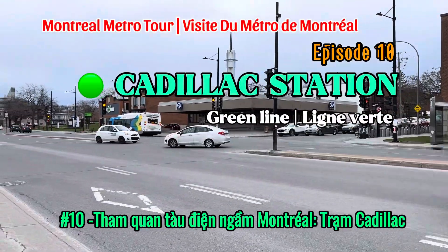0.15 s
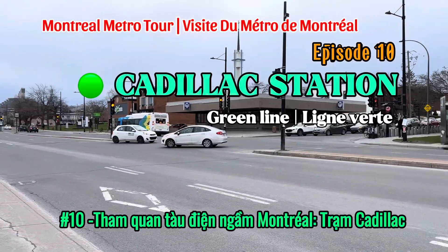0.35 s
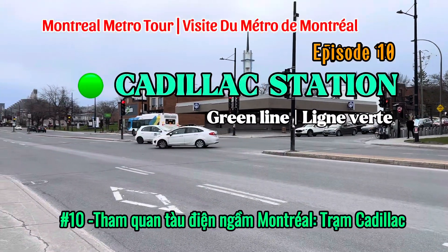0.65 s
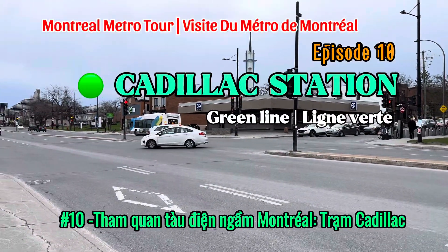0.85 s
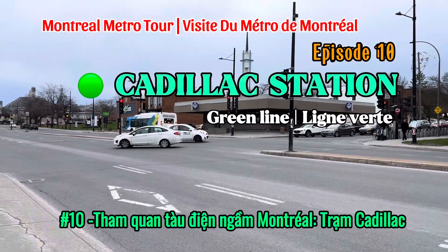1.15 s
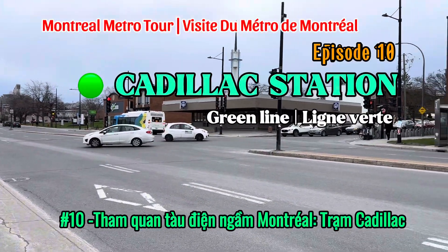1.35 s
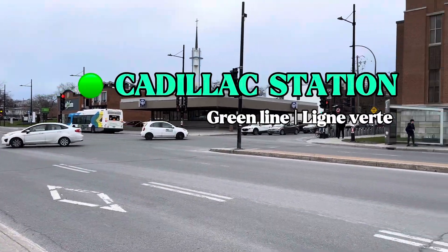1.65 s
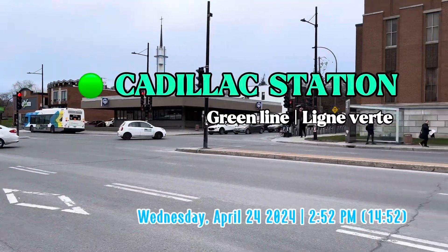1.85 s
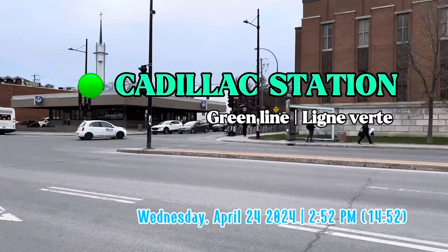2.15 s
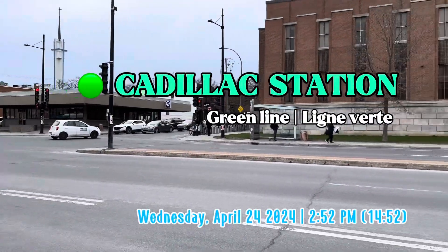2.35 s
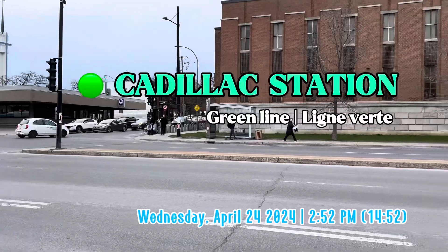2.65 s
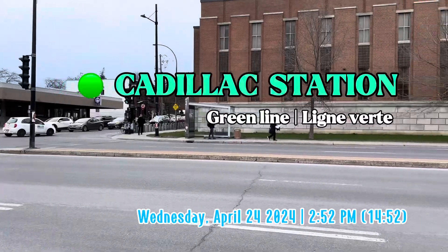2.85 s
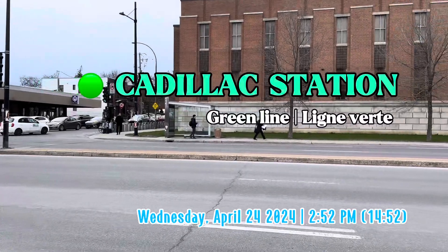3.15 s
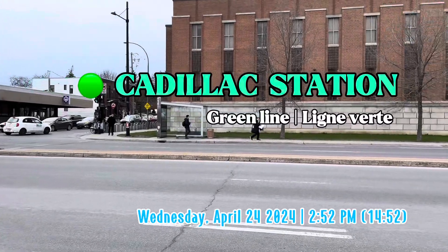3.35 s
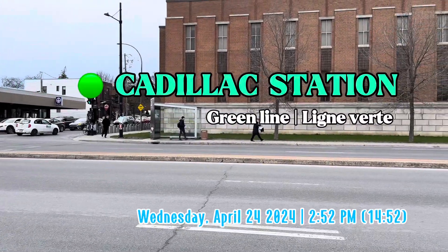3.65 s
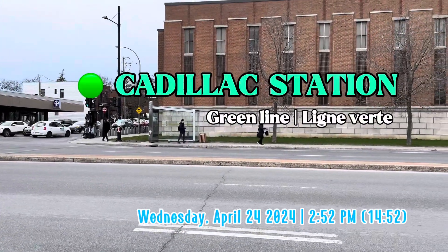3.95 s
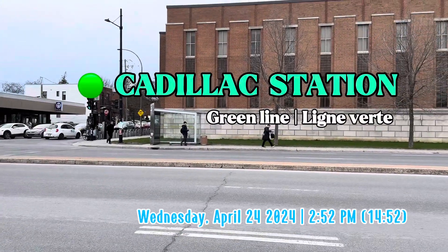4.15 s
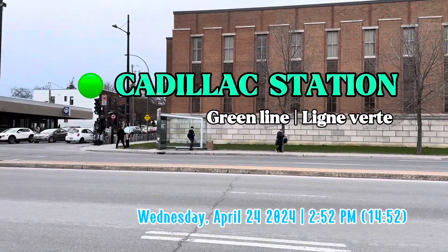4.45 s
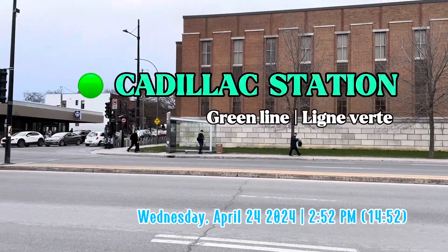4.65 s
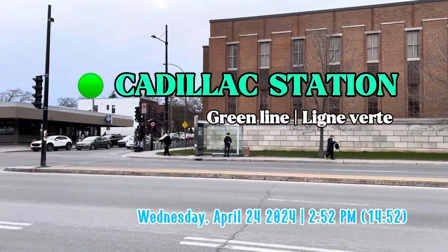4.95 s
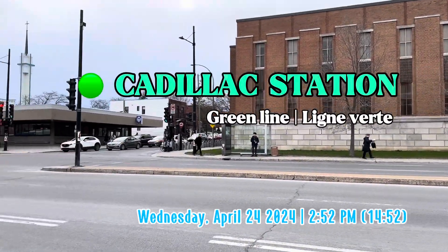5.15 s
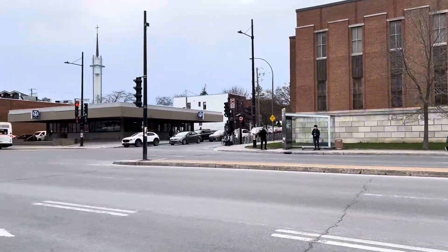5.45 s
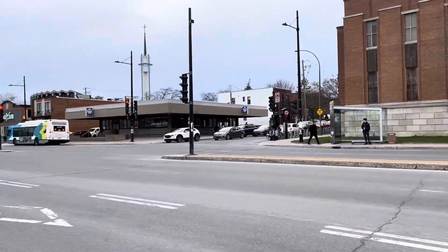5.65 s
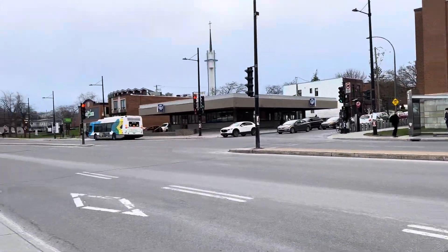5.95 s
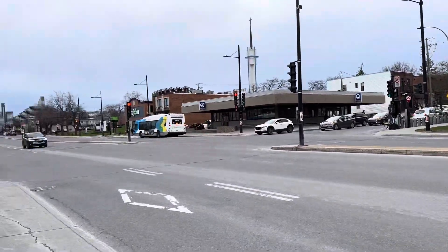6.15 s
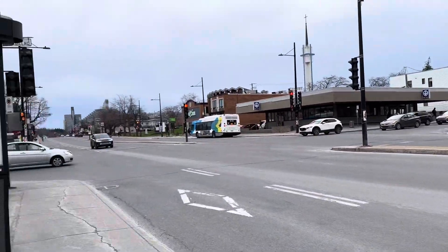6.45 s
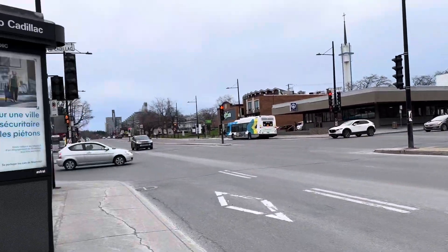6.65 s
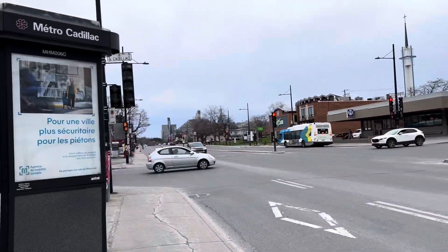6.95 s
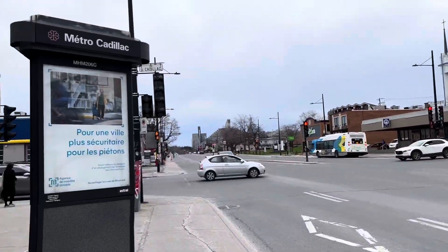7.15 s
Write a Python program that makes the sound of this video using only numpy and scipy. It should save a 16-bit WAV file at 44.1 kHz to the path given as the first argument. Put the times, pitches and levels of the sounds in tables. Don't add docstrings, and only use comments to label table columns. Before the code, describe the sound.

Steady traffic rumble and tyre wash with low buffeting thumps early, gritty snaps, a humming bus engine, and thin high brake squeals near the end.

```python
import sys
import numpy as np
from scipy import signal
from scipy.fft import rfft, irfft
from scipy.io import wavfile
from scipy.ndimage import uniform_filter1d, minimum_filter1d

SR = 44100
rng = np.random.default_rng(int(sys.argv[2]) if len(sys.argv) > 2 else 0)


def volts_from_db(level):
    exponent = np.asarray(level, float) / 20
    return 10 ** exponent


def transcribe(signal):
    frames = np.atleast_2d(signal).T
    limited = np.clip(frames, -1, 1)
    pcm = np.round(limited * 32767).astype(np.int16)
    wavfile.write(sys.argv[1], SR, pcm)


N = 321489
FRAME, HOP = 1024, 256
T = np.arange(N) / SR
FRAME_T = np.arange(N // HOP + 5) * HOP / SR
FRAME_HZ = np.fft.rfftfreq(FRAME, 1 / SR)[:, None]

# pitch_hz, level_db (per Hz)
RUMBLE_COLOUR = [(20, -43.5), (32, -29.5), (45, -2), (64, -2), (120, -7.5), (166, -5), (244, -5),
                 (338, -9.5), (556, -19.5), (900, -42.5), (1200, -78.5)]
TYRE_COLOUR = [(250, -40), (450, -7), (620, -7.5), (850, -2.5), (1100, 6.5), (1500, -2), (2000, -9),
               (2600, -14), (3200, -21), (4500, -37), (7000, -62.5), (11000, -88)]
SLOW_CAR_COLOUR = [(300, -29), (450, 1.5), (600, 4.5), (850, -2.5), (1200, -3), (2000, -14), (2700, -14),
                   (3300, -18), (6000, -33), (11000, -91)]
SPRAY_COLOUR = [(2200, -34.5), (3200, 0), (4200, 1), (5200, -1.5), (6200, -4.5), (7200, -12.5), (8500, -14),
                (10000, -40), (12500, -53.5)]
FAN_COLOUR = [(5600, -18), (7200, -2), (8600, -3), (9400, -3.5), (10200, -7), (11500, -12), (11900, -17),
              (12800, -19.5), (13800, -22.5), (15500, -28), (16000, -60)]
FAST_TREAD_COLOUR = [(700, -33), (1200, 2.5), (1700, -4), (2500, -14), (2900, -15), (4500, -48),
                     (9000, -76.5)]
UNDERBODY_COLOUR = [(100, -29.5), (190, 1), (320, 5), (500, -10), (750, -17.5), (1300, -32.5),
                    (3000, -81.5)]
CLOSE_TYRE_COLOUR = [(500, -29), (800, -3.5), (1020, 3), (1300, -17), (1600, -1), (1850, -11.5),
                     (2500, -12), (4000, -41.5)]
BREEZE_COLOUR = [(20, -4), (50, 3), (100, -2), (200, -19), (400, -53.5)]

# closest_s, roar_db, distance_over_speed_s, spray_db
RIGHT_LANE = [
    (0.0, -34, 0.27, -48.5),
    (.65, -34.5, 0.29, -69.5),
    (1.0, -34.5, 0.79, -54.5),
    (2.15, -41, 0.27, -66),
    (2.7, -41.5, 0.68, -65.5),
    (4.1, -41.5, 0.21, -62.5),
    (4.9, -39.5, 0.37, -67),
]
LEFT_LANE = [
    (.06, -34, 0.18, -57),
    (1.3, -45, 0.49, -52.5),
    (5.9, -48, 0.74, -76),
    (6.5, -41.5, 0.83, -56),
]
# closest_s, roar_db, distance_over_speed_s
FAR_LANE = [
    (2.6, -43, 0.74),
    (4.2, -48, 0.26),
    (4.75, -45.5, 0.31),
    (5.25, -45, .2),
    (6.15, -56, 0.28),
]
# closest_s, boom_db, distance_over_speed_s
CLOSE_BOOM = [
    (.2, -31, 0.26),
]
# closest_s, roar_db, distance_over_speed_s
CLOSE_ROAR = [
    (.06, -33, 0.14),
]
# time_s, level_db, left_late_samples
NEARING = [(5.8, -46.5, -4.5), (6.3, -43, -5), (6.7, -42.5, -3), (7, -38.5, -1.5), (7.29, -41, 1.5)]
# time_s, left_late_samples
RIGHT_LAG = [(0, 6.6), (.12, 11), (.32, 17.9), (1.35, 16.1), (2.2, 17.8), (7.29, 20.8)]
# time_s, direct_share (0-1)
FACING = [(0, 1), (5.55, 1), (5.95, .3), (7.29, .15)]
# pitch_hz, likeness (-1 to 1)
DIFFUSE = [(60, .975), (170, .9), (340, .78), (480, .15), (620, -.65), (900, -.85)]
# pitch_hz, left_late_samples
BEND = [(8500, 15.5), (10100, 15.3), (11000, 15), (11800, 14.8), (13700, 14.5), (15200, 14.5)]

# time_s, firing_tone_db
LOAD = [(0, -32), (1.1, -35), (1.7, -37), (2.0, -30.5), (2.25, -37.5), (2.6, -32.5), (2.85, -38),
        (3.3, -35.5), (3.8, -31.5), (4.5, -35.5), (4.95, -29.5), (5.2, -35), (5.4, -36), (6.15, -40),
        (6.4, -34.5), (6.6, -36), (6.9, -30.5), (7.29, -37)]
# time_s, tick_db
BAY = [(0, -65), (.8, -92), (1.2, -67.5), (1.7, -80.5), (2.3, -90), (3.1, -100), (3.4, -86), (3.7, -100),
       (5.2, -90.5), (5.65, -73), (6.1, -71), (6.45, -59), (6.6, -72), (6.85, -59), (7.29, -62)]
# time_s, level_db
BREEZE = [(0, -52), (1.4, -50), (1.8, -70), (6.4, -66), (6.7, -48), (7.29, -50.5)]
# start_s, length_s, level_db
PUFFS = [
    (0, .45, -76),
    (.5, .12, -84),
    (.76, .2, -81),
    (1.36, .16, -82),
    (1.9, .1, -84),
    (2.3, .08, -85),
    (3.4, .11, -82),
    (5.5, .45, -86),
    (6.43, .08, -80),
]
# middle_s, level_db, swing_hz, length_s
EDDIES = [(0.504, -8, 89.7, 0.0401), (0.527, -13, 95, .04), (0.573, -15.5, 57, .06),
          (0.618, -18, 81, 0.098), (0.645, -15, 77, 0.037), (0.685, -14, 61.6, 0.043),
          (0.763, -15, 75, 0.0503), (0.812, -18, 99.6, .05), (.865, -14, 175, 0.0301),
          (0.869, -17, 74.5, 0.039), (0.884, -10.5, 129, 0.0302), (0.993, -13, 114.5, .035),
          (1.023, -9, 77, 0.042), (0.864, -20.5, 285, 0.018), (1.02, -14.5, 183, 0.0324),
          (1.206, -19.5, 204, 0.027), (1.045, -9, 85.6, .045), (1.051, -27, 190, 0.021),
          (1.133, -24.5, 85, .04), (1.164, -12, 141.5, 0.0277), (1.183, -17.5, 63, 0.053),
          (1.217, -17.5, 89.5, 0.039), (1.263, -12, 68.4, 0.052), (1.258, -19.5, 145, 0.023),
          (1.308, -8.5, 80.8, 0.046), (1.381, -34, 71.6, .05), (5.295, -19, 304, 0.0079),
          (7.003, -17, 178, 0.0085)]
# start_s, length_s, pitch_hz, peak_db, grab_period_s
SQUEALS = [
    (6.105, .35, 9515, -49.5, .18),
    (7.13, .15, 11447, -69, .065),
    (6.28, .22, 7210, -72, .07),
    (6.44, .09, 9500, -64, .06),
]
# start_s, level_db, pitch_hz, length_s, left_over_right_db
CHIRPS = [(.765, -59, 5150, .025, 6), (1.652, -55.5, 5500, 0.034, 8), (4.79, -62, 3850, 0.03, -2),
          (4.797, -63, 5050, .022, 0), (4.84, -62, 3750, .024, 0), (5.408, -53, 4130, .025, -1),
          (5.452, -46, 4340, 0.014, 0), (5.452, -61, 5850, .015, 3), (5.452, -61, 6650, .015, 3),
          (5.822, -62, 6030, .025, 4), (5.858, -63, 6050, .022, 4)]
# start_s, level_db
SLIPS = [
    (6.69, -60),
    (6.746, -57),
    (6.838, -57),
    (6.885, -58),
    (6.922, -58),
    (6.968, -62),
    (7.04, -64),
    (7.075, -67),
    (7.108, -65),
]
# start_s, peak_db, centre_hz, width_hz, left_over_right_db
SNAPS = [(1.3229, -28.5, 3300, 1000, 5), (1.3233, -35, 2400, 700, 1), (1.3232, -41, 6300, 1100, 1),
         (1.323, -45, 11400, 2200, 2), (1.3232, -58, 14500, 2000, 0), (1.3352, -40, 3100, 1200, 4),
         (1.337, -33.5, 3350, 800, 5), (1.339, -40, 3300, 1200, 3), (1.3375, -38, 2200, 900, -3),
         (1.3375, -51, 8600, 1500, 1), (1.3358, -41, 6300, 1200, -3), (1.3358, -44, 8500, 1800, 1),
         (1.3355, -47, 11000, 1800, 1), (1.0305, -45, 8300, 1800, -9), (2.3297, -55, 6500, 5000, 2),
         (3.38, -56, 13500, 4000, -3), (3.479, -51, 11500, 5000, -5), (3.4795, -53, 8500, 2000, -4),
         (3.62, -43.5, 6200, 900, 13), (3.62, -52, 8200, 2000, 7), (3.62, -59, 13000, 6000, 4),
         (4.0996, -27, 950, 500, -2), (4.102, -30, 1700, 500, 4), (4.101, -51.5, 8600, 1600, -8),
         (5.0235, -49, 5500, 2800, 2), (5.2185, -56, 8200, 2500, -2), (5.2185, -48, 3300, 900, -1),
         (5.2885, -50, 5800, 2800, 2), (5.289, -46, 3300, 1000, 1), (5.291, -30, 450, 300, 0),
         (5.318, -57, 8600, 900, -13), (5.3205, -54, 8500, 900, -8), (5.3232, -40, 3700, 900, -3),
         (5.3236, -41, 5100, 1200, -6), (5.3258, -44, 5000, 1400, -6), (5.3252, -45, 3700, 900, -4),
         (5.3238, -46, 8800, 1800, -6), (5.3248, -33, 2300, 800, -5), (5.3245, -28.5, 1500, 800, 1),
         (5.3262, -35, 1700, 900, 0), (5.3245, -53, 14000, 4000, -3), (5.3245, -52, 11000, 2000, -3)]

# pitch_hz, left_over_right_db
PORTS = [(60, 0), (170, 0), (500, 1.5), (950, -2), (1900, -3), (2700, -1), (3900, 2), (5200, 4.5),
         (6000, 6.5), (7000, 3), (8500, -2.5), (11000, -2)]
# pitch_hz, level_db
CENTRE = [(900, 0.1), (1090, -2.5), (1280, 0.5), (1550, 0.3), (1800, 1), (2050, 1.7), (2700, 0),
          (3000, -0.5)]
# pitch_hz, side_gain_db
SIDE_GAIN = [(60, 0.5), (150, 0.5), (300, 1.5), (500, 2), (800, 7.5), (1050, -0.4), (1400, 0), (1800, 4),
             (2050, 0.5), (2900, -1), (4500, -1.5), (8000, -0.5)]


def evened(x):
    return x / np.sqrt(np.mean(x ** 2) + 1e-20)


def read(points, hz):
    f, value = np.transpose(points)
    return np.interp(np.log(hz + 1), np.log(f + 1), value)


def column(rows, t, order):
    rows = np.array(rows, float)
    return np.interp(t, rows[:, 0], rows[:, order])


def add(mix, s, sound, pan_db=0, lag=0):
    for side, (shift, sign) in enumerate([(lag, 1), (0, -1)]):
        part = mix[side, round(s * SR) + round(shift):][:len(sound)]
        part += sound[:len(part)] * volts_from_db(sign * pan_db / 2)


def wander(rate_hz, size):
    white = rng.standard_normal(size) * (np.arange(size) > 0)
    lowpass = signal.butter(2, rate_hz, fs=SR, output="sos")
    return evened(signal.sosfiltfilt(lowpass, white, padtype=None))


def summed(*dbs):
    return 10 * np.log10(sum(volts_from_db(2 * db) for db in dbs))


def lane(cars, t, order):
    return summed(*(car[order] - 11 * np.log10(1 + ((t - car[0]) / car[2]) ** 2) for car in cars))


def stream(colour, db, same, patchy_db, lag=0):
    a, b, c, d, patches = rng.standard_normal((len(FRAME_T), len(FRAME_HZ), 5)).T
    patches = uniform_filter1d(patches, size=12, axis=0)
    patches = evened(uniform_filter1d(patches, size=16, axis=1))
    same = np.clip(same, -1, 1)
    right = a + 1j * b
    direct = right * np.exp(-2j * np.pi * FRAME_HZ * lag / SR)
    left = same * direct + np.sqrt(1 - same ** 2) * (c + 1j * d)
    z = np.array([left, right]) * volts_from_db(read(colour, FRAME_HZ) + patchy_db * patches)
    noise = signal.istft(z, nperseg=FRAME, noverlap=FRAME - HOP)[1][:, :N]
    return volts_from_db(db) * evened(noise)


def rumble():
    tail_s = 0.19
    roar_db = lane(RIGHT_LANE + LEFT_LANE, T - tail_s, order=1)
    near_db = column(NEARING, T, order=1)
    db = summed(summed(roar_db, near_db) + 0.5, -32)
    return stream(RUMBLE_COLOUR, db, lag=6.6, same=read(DIFFUSE, FRAME_HZ), patchy_db=0.75)


def tyre_roar(gust):
    right = stream(TYRE_COLOUR, lane(RIGHT_LANE, T, order=1), lag=column(RIGHT_LAG, FRAME_T, order=1),
                   same=0.85 * column(FACING, FRAME_T, order=1), patchy_db=1.5)
    left = stream(TYRE_COLOUR, lane(LEFT_LANE, T, order=1), lag=-17, same=0.88, patchy_db=2.5)
    nearing = stream(SLOW_CAR_COLOUR, column(NEARING, T, order=1),
                     lag=column(NEARING, FRAME_T, order=2), same=.8, patchy_db=1.2)
    return (right + left + nearing) * volts_from_db(0.67 * gust)


def spray_and_fan(gust):
    spray_db = summed(lane(RIGHT_LANE + LEFT_LANE, T, order=3), -73.5)
    bay_db = -66 + 0.47 * (column(BAY, T, order=1) + 72)
    fan_db = summed(spray_db - 22, bay_db, -81.5)
    spray = stream(SPRAY_COLOUR, spray_db, lag=column(RIGHT_LAG, FRAME_T, order=1), same=0.17, patchy_db=0.9)
    fan = stream(FAN_COLOUR, fan_db, lag=read(BEND, FRAME_HZ), same=.86, patchy_db=2.2)
    return (spray + fan) * volts_from_db(gust)


def close_car():
    boom = stream(UNDERBODY_COLOUR, lane(CLOSE_BOOM, T, order=1), lag=7.5, same=0.77, patchy_db=4.5)
    tyres = stream(CLOSE_TYRE_COLOUR, lane(CLOSE_ROAR, T, order=1), lag=9.6, same=0.57, patchy_db=-0.5)
    return boom + tyres


def diesel():
    tone_db = column(LOAD, T, order=1)
    octave_db = -43.5 - 0.38 * (tone_db - tone_db.mean()) + 2.64 * wander(2.3, N)
    turns = 60 * T
    tone = volts_from_db(tone_db + 2.5 * wander(27, N)) * np.sin(2 * np.pi * turns + .5 * wander(2.7, N))
    octave = volts_from_db(octave_db + 2.2 * wander(34.0, N)) * np.sin(4 * np.pi * turns + 1.8 * wander(11.85, N))
    cycles = turns / 2 + .16 + 0.05 * wander(13, N)
    strength = volts_from_db(2.7 * rng.standard_normal(300))[cycles.astype(int)]
    gate = np.exp(-(cycles % 1) / .11) * strength + .22
    band = signal.butter(3, [9200, 11700], "bandpass", fs=SR, output="sos")
    ticks = evened(signal.sosfilt(band, gate * rng.standard_normal(N)))
    ticks = volts_from_db(column(BAY, T, order=1)) * ticks
    late_ticks = np.roll(ticks, 15)
    return np.sqrt(2) * (tone + octave) + np.array([late_ticks, ticks])


def breeze():
    return stream(BREEZE_COLOUR, column(BREEZE, T, order=1), same=.1, patchy_db=9.0)


def air_valves():
    out = np.zeros((2, N))
    band = signal.butter(3, [14500, 15600], "bandpass", fs=SR, output="sos")
    for s, length, db in PUFFS:
        jet = evened(signal.sosfilt(band, rng.standard_normal(round(length * SR))))
        level = volts_from_db(db + 4.0 * wander(25, len(jet)))
        add(out, s, level * jet * signal.windows.tukey(len(jet), .4), pan_db=-3, lag=9)
    return out


def far_lane():
    return stream(FAST_TREAD_COLOUR, lane(FAR_LANE, T, order=1), lag=19.6, same=0.88, patchy_db=0.5)


def wake():
    out = np.zeros((2, N))
    for s, db, hz, length in EDDIES:
        u = np.linspace(-1, 1, round(1.346 * length * SR))
        turns = np.cumsum(hz * (1 - 0.1 * u)) / SR
        turns = turns - turns[len(u) // 2] + .25
        swing = np.sin(2 * np.pi * turns) + 0.41 * wander(170, len(u))
        push = volts_from_db(db - 3.0) * np.cos(np.pi * u / 2) ** 2 * swing
        add(out, s - .7 * length, push, pan_db=2.8 * rng.standard_normal())
    return out


def brakes():
    out = np.zeros((2, N))
    for k, (s, length, hz, db, period) in enumerate(SQUEALS):
        t = np.arange(0, length, 1 / SR)
        climb_per_s = .024 if k == 0 else 0
        turns = np.cumsum(hz * (1 + climb_per_s * np.minimum(t, .7 * length))) / SR
        grab_db = -6 * np.sin(np.pi * (t / period - .75)) ** 2
        level = volts_from_db(db + grab_db + 2.2 + .8 * wander(18, len(t))) * np.sqrt(2)
        squeal = level * np.sin(2 * np.pi * turns) * signal.windows.tukey(len(t), .2)
        add(out, s, squeal, lag=20 if 9000 < hz < 10000 else 15)
    slip_hz, slip_s = 8400, .042
    slips = [(s, db, slip_hz, slip_s, 0) for s, db in SLIPS]
    for s, db, hz, length, pan_db in CHIRPS + slips:
        t = np.arange(0, length, 1 / SR)
        tighten_per_s = 1.2 if hz < 4500 else 0
        unsteady = .5 if hz < slip_hz else .2
        level = volts_from_db(db + 1.8 * wander(150, len(t)))
        phase = 2 * np.pi * hz * t * (1 + tighten_per_s * t / 2) + unsteady * wander(150, len(t))
        add(out, s, level * np.sin(phase) * signal.windows.tukey(len(t), .6), pan_db)
    return out


def grit():
    out, t = np.zeros((2, N)), np.arange(400) / SR
    for s, db, hz, width_hz, pan_db in SNAPS:
        snap = (rng.standard_normal(len(t)) + 6 * (t == 0)) * np.exp(-t / 0.0013)
        for widening in (1, 2, 2):
            snap = signal.lfilter(*signal.iirpeak(hz, hz / width_hz / widening, SR), snap)
        lag = -np.clip(2 * pan_db, -12, 12) * (hz < 2700)
        add(out, s, volts_from_db(db) * snap / abs(snap).max(), pan_db, lag)
    return out


def unmasked(x):
    mid_side = np.array([x[0] + x[1], x[0] - x[1]]) / 2
    hz, t, z = signal.stft(mid_side, SR, nperseg=2048, noverlap=1024)
    width = 8
    bands = len(hz) // width
    power = (abs(z[:, :bands * width]) ** 2).reshape(2, bands, width, -1).mean(2)
    power = uniform_filter1d(power, size=3, axis=2)
    khz = hz[width // 2::width][:bands] / 1000
    high = khz > 9.65

    gap = khz[:, None] - khz[None]
    spread = volts_from_db(2 * np.where(gap > 0, -6 * gap, 15 * gap)) * (khz > 8.6) * (gap != 0)
    treble = power[0, (khz > 7.3) & (khz < 9.3)].mean(0)
    treble_db = uniform_filter1d(10 * np.log10(treble + 1e-20), size=9)
    margin_db = np.maximum(9 - 3.2 * (treble_db - np.median(treble_db)), 4) - np.exp(-t / .2)
    mask = (spread[:, :, None] * power.max(0)[None]).max(1) * volts_from_db(-2 * margin_db)
    mask = minimum_filter1d(mask, size=3, axis=1)

    mid_dip = [[7], [0]] * np.exp(-((khz - 13.9) / .7) ** 2)
    side_dip = [[0], [12]] * np.exp(-((khz - 12.5) / .7) ** 2)
    thrift_db = np.where(khz > 11.75, mid_dip + side_dip + [[3], [0]], 0) + [[6], [1.5]] * high
    luck = uniform_filter1d(rng.standard_normal(power.shape), size=2, axis=2)
    luck = evened(uniform_filter1d(luck, size=2, axis=1))
    luck_db = 4.5 * luck + 2.5 * rng.standard_normal(len(t))
    mask = mask * volts_from_db(2 * luck_db * high[:, None])

    kept = (power / volts_from_db(2 * thrift_db)[:, :, None] > mask) | (khz < 8.3)[:, None]
    hidden_db = np.minimum(margin_db, 10) + 3.5 * luck[0]
    kept[1] &= (power[1] > power[0] * volts_from_db(-2 * hidden_db)) | (khz < 7.2)[:, None]
    floor = np.repeat(mask * volts_from_db(2 * (thrift_db - 4))[:, :, None] * high[:, None], width, axis=1)
    lines = z[:, :bands * width]
    z[:, :bands * width] = lines * np.repeat(kept, width, axis=1) * (abs(lines) ** 2 > floor)
    mid, side = signal.istft(z, SR, nperseg=2048, noverlap=1024)[1][:, :N]
    return np.array([mid + side, mid - side])


def scene():
    gust = wander(17.6, N)
    road = rumble() + tyre_roar(gust) + spray_and_fan(gust) + close_car() + far_lane()
    return road + diesel() + breeze() + air_valves() + wake() + brakes() + grit()


def band_limit(x):
    return signal.sosfilt(signal.butter(12, 15700, fs=SR, output="sos"), x)


def record(dry):
    hz = np.fft.rfftfreq(N, 1 / SR)
    tilt_db = read(PORTS, hz) / 2
    bass_cut = 1 / np.sqrt(1 + (37 / (hz + 1)) ** 6)
    left, right = rfft(dry) * volts_from_db([tilt_db, -tilt_db]) * bass_cut
    mid = volts_from_db(read(CENTRE, hz)) * (left + right) / 2
    side = volts_from_db(read(SIDE_GAIN, hz)) * (left - right) / 2
    wide = irfft(np.array([mid + side, mid - side]), N)
    limited = .95 * np.tanh(wide / .95)
    return band_limit(unmasked(limited))


dry = scene()
out = record(dry)
transcribe(out)
```